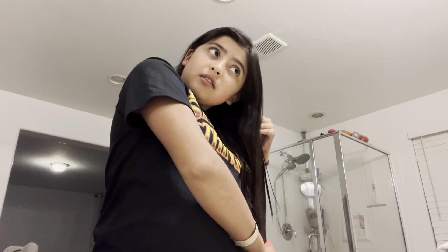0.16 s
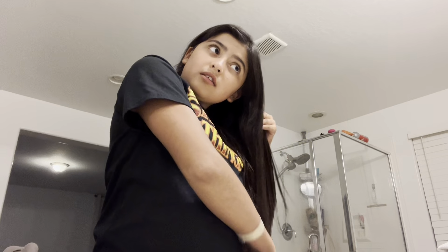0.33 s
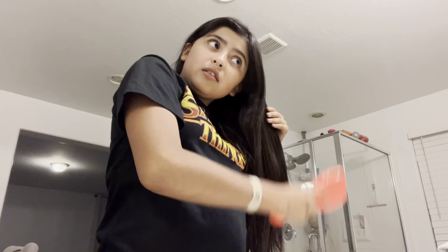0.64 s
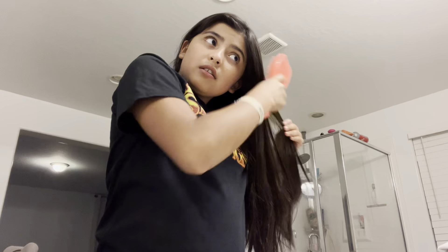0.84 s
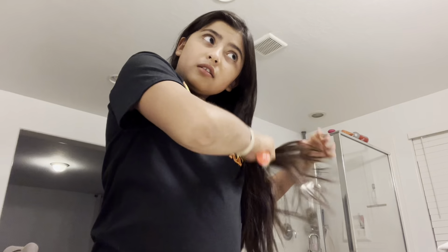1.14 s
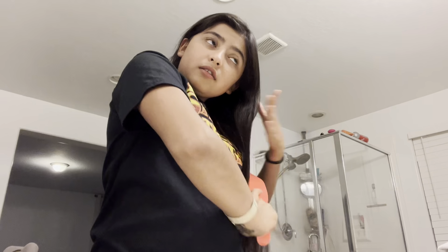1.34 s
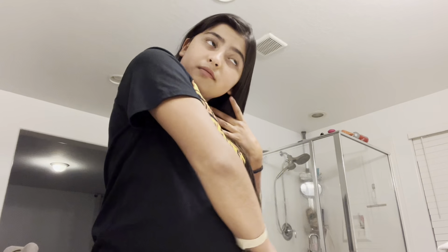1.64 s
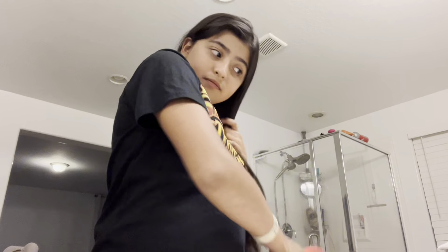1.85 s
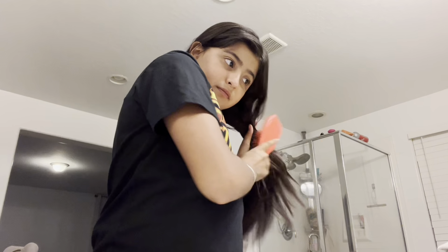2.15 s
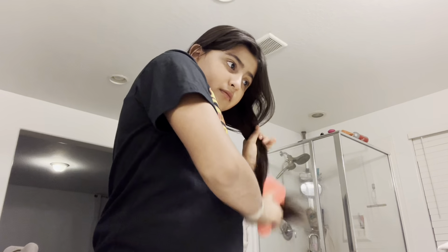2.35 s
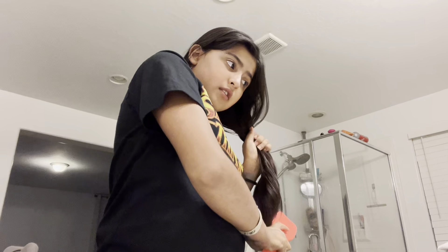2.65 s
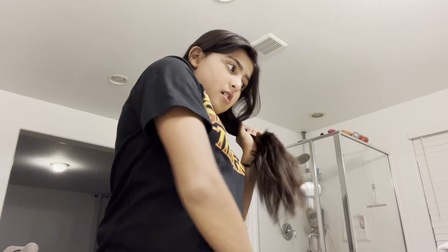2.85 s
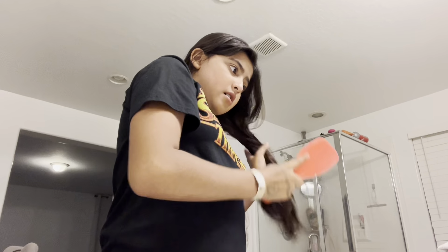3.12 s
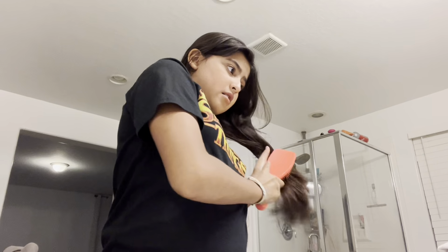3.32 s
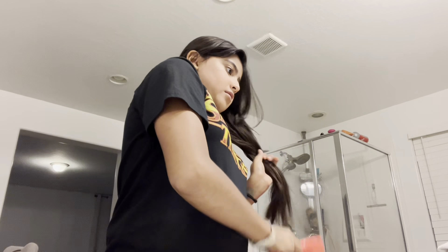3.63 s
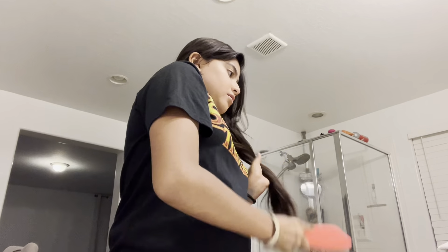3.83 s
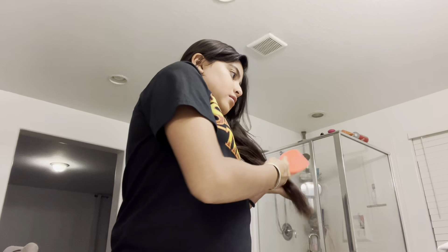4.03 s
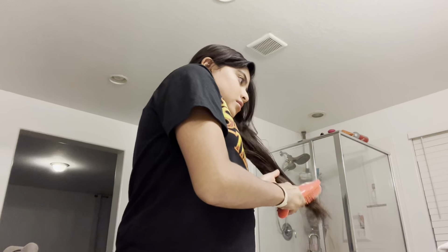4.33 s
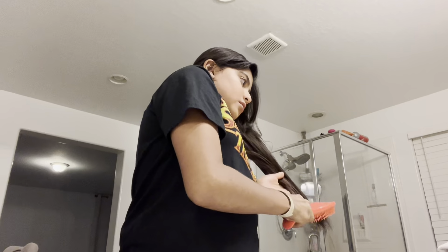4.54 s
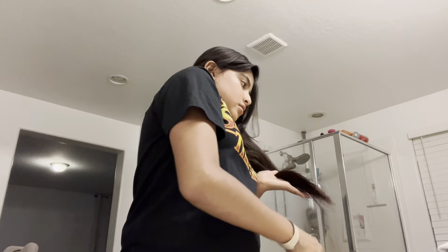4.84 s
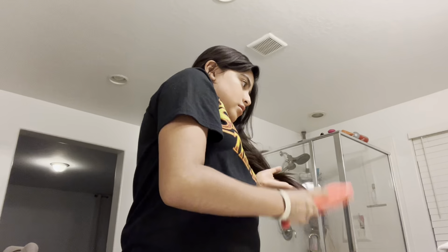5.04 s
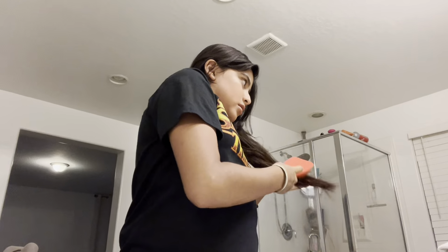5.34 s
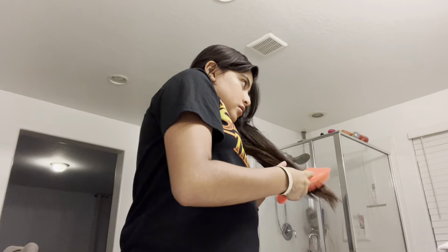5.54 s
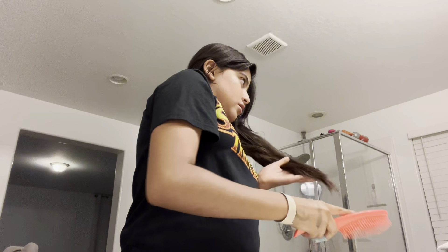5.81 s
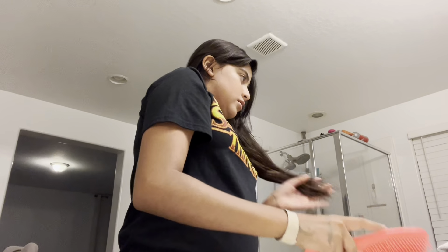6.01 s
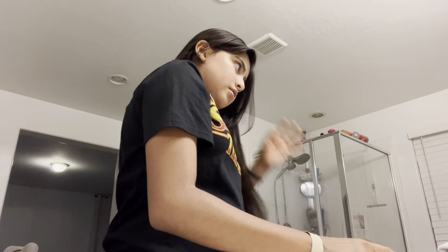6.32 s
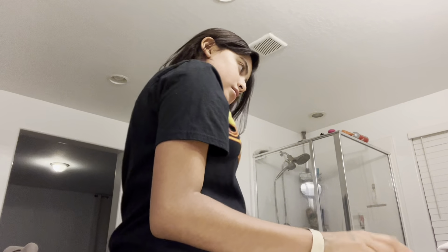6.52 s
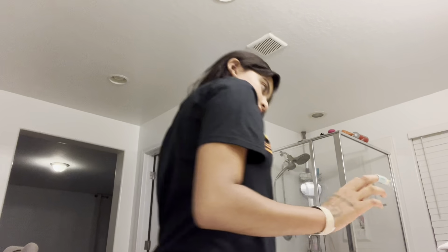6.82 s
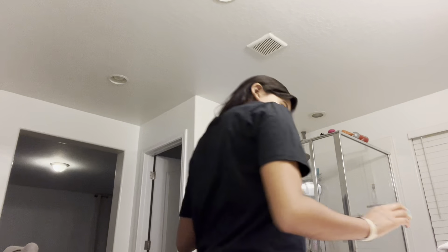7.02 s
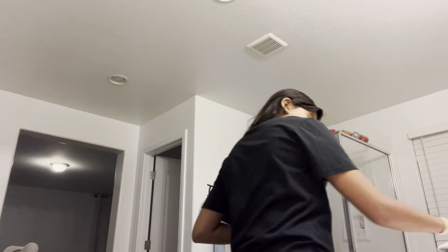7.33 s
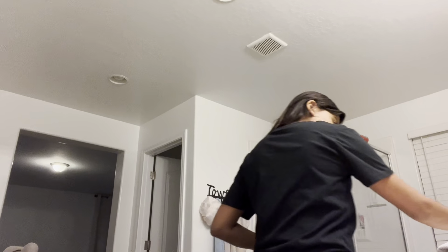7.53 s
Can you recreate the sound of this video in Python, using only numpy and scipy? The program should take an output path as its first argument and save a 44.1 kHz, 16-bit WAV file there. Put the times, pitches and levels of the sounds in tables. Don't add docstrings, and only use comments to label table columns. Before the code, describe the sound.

In a small tiled bathroom, a hollow plastic brush is pulled through long hair in short, uneven strokes: bristles tick on landing, strands hiss, knots snag and pop. Looser hair swishes between pulls. Late on, the brush back knocks hard once on an edge, with a brief tiled echo. A few weaker strokes follow, then handling rustle and dull set-downs on the counter. A deep, unsteady machine rumble runs throughout, picked up by a close stereo phone microphone.

```python
import sys
import numpy as np
from scipy import signal
from scipy.fft import rfft, irfft, next_fast_len
from scipy.io import wavfile
from scipy.ndimage import map_coordinates

SR = 44100
rng = np.random.default_rng(int(sys.argv[2]) if len(sys.argv) > 2 else 0)


def elevation(decibels):
    levels = np.asarray(decibels, float)
    return 10 ** (levels / 20)


def unload_wav(signal):
    wavfile.write(
        sys.argv[1],
        SR,
        np.round(np.clip(np.atleast_2d(signal).T, -1, 1) * 32767).astype(np.int16),
    )


N = 338247
EDGE = 4096

# (frequency [Hz], width [Hz], level [dB])
CUSHION = [(355, 65, -4.5), (481.4, 36, 4.5), (636.7, 167, 3.5), (685, 42, 10), (808, 31.4, 0)]
# (frequency [Hz], width [Hz], level [dB])
STIFF_BACK = [(916, 75, -5.5), (1053, 87, 2.5), (1124, 120, 2), (1356, 382, -10)]
# (frequency [Hz], width [Hz], level [dB])
CONTACT = [(2020, 4200, -13.5), (4280, 3100, -3.5), (8850, 3700, -31.5)]


def unit(x):
    return x / np.sqrt(np.mean(x ** 2) + 1e-20)


def along(points, hz):
    f, v = np.transpose(points)
    return np.interp(np.log(hz + 1), np.log(f + 1), v)


def curves(rows):
    s, *cols = np.transpose(rows)
    return [np.interp(np.arange(N) / SR, s, c) for c in cols]


def wobble(rate):
    points = rng.standard_normal(int(N * rate / SR) + 4)
    return map_coordinates(points, [np.arange(N) * rate / SR])


def filtered(x, response, mirror="even"):
    wide = np.pad(x, [(0, 0)] * (x.ndim - 1) + [(EDGE, EDGE)], "reflect", reflect_type=mirror)
    m = next_fast_len(N + SR // 2)
    spectrum = rfft(wide, m) * response(np.fft.rfftfreq(m, 1 / SR))
    return irfft(spectrum, m)[..., EDGE:EDGE + N]


def resonances(modes):
    def response(f):
        total = 0
        for k, (centre, width, db) in enumerate(modes):
            peak = 1j * f * width / (centre * centre - f * f + 1j * f * width)
            total = total + (-1) ** k * elevation(db) * peak
        return total
    return response


def spread(pair):
    # (frequency [Hz], left-right likeness [-1 to 1])
    alike = [(60, 0.92), (130, 1), (290, 0.88), (600, -0.18), (1400, 0.45), (3100, 0.11), (6000, -0.046)]

    def mid_and_side(hz):
        turn = np.arccos(np.clip(along(alike, hz), -1, 1)) / 2
        return np.array([np.cos(turn), np.sin(turn)])
    mid, side = filtered(pair, mid_and_side, "odd")
    return np.array([mid + side, mid - side])


def sideways(x, lag_s):
    late = filtered(x, lambda f: np.exp(-2j * np.pi * f * lag_s))
    return spread(np.array([x, -late]))


def humps(rows, db, rest_db=-120):
    s, rise, fall = np.transpose(rows)[:3, :, None]
    t = np.arange(N * 1000 // SR + 2) / 1000 - s
    away = np.maximum(-t / rise, t / fall) ** 1.253
    shape_db = db[:, None] - 20 * away
    return elevation(rest_db) ** 2 + np.sum(elevation(shape_db) ** 2, axis=0)


def level(power):
    return np.interp(np.arange(N) / SR * 1000, np.arange(len(power)), 10 * np.log10(power))


def rumble():
    # (peak [s], rise [s], fall [s], level [dB], pitch [Hz])
    boom = [(0.0, .3, 0.54, -30, 64.7), (.49, 0.56, 0.2, -31, 72.72), (.79, 0.11, 0.089, -25, 69.1),
            (.92, 0.15, 0.2, -32.5, 75.14), (1.179, 0.16, 0.29, -37, 72.6), (1.6, 0.62, 0.36, -54.5, 63.73),
            (1.98, 0.14, 0.073, -26, 70.82), (2.22, 0.78, 0.42, -33, 71.03), (2.71, 0.31, 0.19, -41, 69.6),
            (3.099, 0.053, 0.021, -31, 78.24), (3.3, 0.048, 0.75, -44.5, 71.3),
            (3.54, .25, 0.26, -40, 66.76), (3.82, 0.046, 0.4, -29.5, 72.39), (4.12, .4, 0.13, -32, 72.7),
            (4.33, 0.27, 0.28, -48.5, 64.66), (4.63, 0.078, 0.17, -41.5, 74.04),
            (5.001, 0.031, 0.46, -33, 69.46), (5.54, 0.06, 0.37, -44, 69.6),
            (5.62, 0.42, 0.04, -36.5, 68.14), (5.978, 0.12, 0.19, -25.5, 70.55),
            (6.18, 0.41, 0.26, -33, 67.67), (6.598, 0.18, 0.24, -40.5, 69.7), (7.07, 0.26, 0.42, -31, 72.6),
            (7.48, 0.11, 0.11, -31.5, 67)]
    # (peak [s], rise [s], fall [s], level [dB])
    hum = [(.21, 0.14, .15, -43), (.55, 0.41, 0.51, -50.5), (0.872, 0.092, 0.34, -40.5),
           (1.18, 0.039, 0.18, -36), (1.49, 0.055, .2, -33), (1.95, 1, .15, -52), (2.22, 0.26, 0.24, -41.5),
           (2.71, 0.12, 0.23, -35), (3.099, 0.22, 0.089, -46.5), (3.27, 0.12, 0.19, -36.5),
           (3.541, 0.061, 0.11, -36), (3.82, .1, 0.15, -46.5), (4.12, .1, 0.11, -56), (4.34, .3, 0.51, -61),
           (4.64, 0.16, 0.076, -44), (4.959, 0.28, 0.16, -43.5), (5.529, 0.057, 0.048, -37.5),
           (5.83, 0.035, 0.093, -34), (6.07, 0.18, 0.38, -51), (6.259, 0.11, 0.09, -33.5),
           (6.43, .3, 0.37, -44.5), (6.77, 0.14, 0.037, -34.5), (6.9, 0.066, 0.19, -47),
           (7.15, .04, .13, -39), (7.478, 0.12, 0.31, -31.5)]
    # (frequency [Hz], density [dB per Hz])
    broad_colour = [(13, -71.5), (22, -45), (43, -10.5), (56, -5), (82, -8), (130, -10), (173, -15.5),
                    (205, -21), (283, -27.5), (400, -36), (600, -63), (1200, -100)]
    # (frequency [Hz], density [dB per Hz])
    air_colour = [(180, -33), (300, -16), (500, -18), (750, -31.5), (1280, -24.5), (1680, -35.5),
                  (9000, -44), (13500, -40), (15600, -47.5), (16500, -110)]
    low_db, second_db = [level(humps(rows, np.transpose(rows)[3], rest_db=-62.5)) for rows in (boom, hum)]
    low_hz, = curves([(row[0], row[4]) for row in boom])
    low_phase = 2 * np.pi * np.cumsum(low_hz + 2.67 * wobble(6.3)) / SR
    second_phase = 2 * np.pi * np.cumsum(99 + 7 * wobble(5.7)) / SR
    low = np.sqrt(2) * elevation(low_db - 2.5) * np.sin(low_phase)
    second = np.sqrt(2) * elevation(second_db - 0.87) * np.sin(second_phase)
    broad_db = -44.5 + 0.11 * (second_db - second_db.mean())
    broad = unit(filtered(rng.standard_normal((2, N)), lambda f: elevation(along(broad_colour, f))))
    air = unit(filtered(rng.standard_normal((2, N)), lambda f: elevation(along(air_colour, f))))
    return low + second + spread(elevation(broad_db) * broad + elevation(-75.5) * air)


def bathroom(x):
    # (frequency [Hz], time to fall by 60 dB [s])
    tiles = [(200, 0.3), (700, 0.39), (2000, 0.43), (5000, .25), (12000, 0.23)]
    hz, t, z = signal.stft(rng.standard_normal((2, SR // 2)), SR, nperseg=256)
    decay = elevation(-60 * t / along(tiles, hz)[:, None])
    build_up = 1 - np.exp(-t / 0.0045)
    tail = signal.istft(z * decay * build_up, SR, nperseg=256)[1]
    tail = tail / np.linalg.norm(tail[0])
    late = np.pad(x, (150, 0))[None]
    return spread(signal.fftconvolve(late, tail, axes=1)[:, :N])


def first_echoes(x):
    # (delay [s], level [dB], left over right [ratio])
    walls = [
        (.0068, -8.5, -1),
        (.011, -21, -.6),
        (0.0156, -19, -.3),
    ]
    dull = signal.lfilter(*signal.butter(1, 1500, fs=SR), x)
    return sum(elevation(db) * np.array([[left], [1]]) * np.roll(dull, round(s * SR)) for s, db, left in walls)


def near_walls(pair):
    t = np.arange(SR // 16) / SR
    echo = rng.standard_normal((2, len(t))) * elevation(-60 * t / 0.086)
    echo = echo / np.linalg.norm(echo, axis=1, keepdims=True)
    one, other = signal.fftconvolve(pair[:1], echo, axes=1)[:, :N]
    turn = 2 * np.pi * 0.45 * np.arange(N) / SR
    left = np.cos(turn) * one + np.sin(turn) * other
    right = np.cos(turn) * other - np.sin(turn) * one
    return pair + 1.15 * np.array([left, right])


def thuds():
    # (time [s], peak level [dB], pitch [Hz])
    set_downs = [
        (6.8, -43, 193),
        (6.875, -35, 179.6),
        (7.0, -40.5, 158.7),
        (7.452, -26.5, 118.7),
    ]
    out, t = np.zeros(N + SR), np.arange(SR // 4) / SR
    for s, db, hz in set_downs:
        swell = elevation(db - 60 * t / 0.25) * (1 - np.exp(-t / 0.0056))
        band = signal.butter(2, [hz * 0.76, hz * 1.96], "band", fs=SR)
        puff = unit(signal.lfilter(*band, rng.standard_normal(len(t))))
        out[round(s * SR):][:len(t)] += swell * (0.21 * np.sin(2 * np.pi * hz * t) + 0.5 * puff)
    return out[:N]


def knock():
    # (time [s], peak level [dB], crack level [dB])
    blows = [
        (4.8769, -29.5, -30),
        (4.879, -13, -21),
    ]
    # (frequency [Hz], level [dB], time to fall by 60 dB [s])
    shell = [(366, -19, 0.073), (408.5, -1.5, 0.043), (557, -10, 0.036), (710, -7.5, 0.049),
             (744, 6, 0.017), (865, 2.5, 0.016), (1020, -6, 0.018), (1190, -6.5, 0.038),
             (1412, -2.5, 0.018), (1770, -6.5, 0.011), (2030, -16.5, 0.022), (2510, -12.5, 0.01)]
    out, contact, t = np.zeros(N + SR), np.zeros(N), np.arange(SR // 3) / SR
    for s, db, crack_db in blows:
        ring = sum(elevation(mode_db - 60 * t / t60) * np.sin(2 * np.pi * hz * t) for hz, mode_db, t60 in shell)
        ring = ring * (1 - np.exp(-t / 0.00066))
        wisp = elevation(crack_db - 9.5 - 60 * t / 0.037) * rng.standard_normal(len(t))
        out[round((s + 0.0021) * SR):][:len(t)] += elevation(db - 1.0) * (ring + wisp)
        contact[round((s + 0.0012) * SR)] = elevation(db + crack_db + 19.5)
    crack = filtered(contact, lambda f: sum(resonances([peak])(f) for peak in CONTACT))
    return out[:N] + crack


def taps():
    # (time [s], tick level [dB], push on the pad [dB], tick pitch [Hz])
    landings = [(0.0005, -44, 3, 3000), (0.1342, -45, -2, 2080), (0.2867, -52, 15, 2380),
                (0.755, -65, -25, 6580), (1.333, -42, -14, 3920), (1.4068, -33, -32, 2120),
                (1.697, -37, 11, 2940), (1.6633, -55.5, -3.5, 3830), (2.1906, -52, -1, 4200),
                (2.2004, -60, 21.5, 2426), (2.2591, -51.5, 13.5, 2388), (2.529, -47, -18, 4560),
                (2.6106, -54, -1, 2869), (2.616, -49, 9, 5050), (2.6779, -51, 17, 3080),
                (2.7013, -31, 4.5, 4400), (2.7025, -41, 6, 2204), (3.3075, -52, 9.5, 3032),
                (3.4363, -72, 12, 1963), (3.455, -56, 4, 2000), (3.483, -54, 1, 5200),
                (4.149, -46.5, -8, 2300), (4.239, -57, 0.5, 2600), (4.093, -50.5, -4.5, 3500),
                (4.17, -50.5, 10.5, 2503), (4.196, -62, 15, 2106), (4.401, -50, 3, 2800),
                (4.47, -42.5, 4.5, 3200), (4.6412, -69.5, 12.5, 2065), (4.7074, -58.5, 16.5, 2000),
                (4.733, -41, 3, 4000), (5.3262, -58.5, -1, 4200), (5.4087, -50, -6, 2400),
                (5.4164, -47.5, -1, 2519), (5.5243, -49, 2, 2000), (5.5633, -57, -4, 2400),
                (5.5844, -52, -9, 2400), (5.9806, -66.5, -9, 3020), (6.2682, -52, 0, 2205),
                (6.2894, -57, -9, 2100), (6.3604, -78.5, 21, 2020), (6.868, -65, 5, 3570),
                (6.991, -38, -1.5, 1698), (7.439, -58, 9, 2507), (7.456, -49, -15, 7500),
                (6.982, -56, 0, 4000)]
    # (time [s], tick level [dB], push on the pad [dB], tick pitch [Hz])
    further_taps = [(1.402, -51, -11, 7000), (1.431, -50, -3, 3200), (1.447, -45, 6.5, 2200),
                    (1.467, -48.5, 2, 2800), (1.495, -50, -5, 4500), (2.265, -44, 8, 2184),
                    (2.308, -46.5, 8, 4800), (2.366, -50, 1.5, 3404), (2.448, -41, 4, 2200),
                    (5.5523, -55, 1, 2000), (6.3064, -50, -3, 1900), (6.3335, -56, -4, 1800),
                    (6.791, -67, 12, 3500), (2.203, -53.5, 9, 1500), (4.4687, -52.5, 12.5, 1500)]
    ticks, pushes, t = np.zeros(N + SR), np.zeros(N), np.arange(400) / SR
    for s, db, pad_db, hz in landings + further_taps:
        tips = signal.butter(2, [hz / 2.14, hz * 1.24], "band", fs=SR)
        burst = elevation(-60 * t / 0.013) * (0.5 * rng.standard_normal(len(t)) + (t == 0))
        tick = signal.lfilter(*tips, burst) + 0.03 * burst
        ticks[round(s * SR):][:len(t)] += elevation(db + 12.5) * tick
        pushes[round(s * SR)] = elevation(db + pad_db + 29)
    crisp = signal.lfilter([1, -1], [1, -0.8], ticks[:N])
    return crisp + filtered(pushes, resonances(CUSHION + STIFF_BACK))


def scrape(times, rows, width, rise, steady):
    out = np.zeros((2, N + SR))
    for (start, length), (hz, end_hz, db) in zip(times, rows):
        u = np.arange(round(length * SR)) / (SR * length)
        fall = np.minimum((1 - u) / (1 - rise), 1) ** np.exp(-length / 0.4)
        fade = np.minimum(u / rise, 1) * fall
        low_pass = signal.butter(3, width * (1 + length / 0.4) * hz / 2, fs=SR)
        noise = signal.lfilter(*low_pass, rng.standard_normal((2, 2, len(u) + EDGE)))
        noise = unit(noise)[..., EDGE:]
        tone = steady * np.exp(-(length / 0.09) ** 2)
        turn = 2 * np.pi * np.cumsum(hz + (end_hz - hz) * u) / SR
        band = (noise[0] + tone) * np.cos(turn) + noise[1] * np.sin(turn)
        out[:, round(start * SR):][:, :len(u)] += elevation(db) * fade * band
    return out[:, :N]


def rubs():
    # (start [s], length [s])
    rub_times = [(.12, .04), (.29, .05), (1.44, .06), (1.665, .05), (1.675, .06), (1.73, .04), (2.255, .05),
                 (2.34, .07), (3.432, .08), (6.26, .16), (6.35, .07), (6.43, .06), (6.5, .28), (6.862, .05),
                 (6.985, .13), (7.05, .16), (2.348, .025), (1.405, .02), (6.77, .2), (6.4, .16),
                 (2.702, .015), (4.866, .014), (4.638, .02)]
    # (start pitch [Hz], end pitch [Hz], level [dB])
    rub_rings = [(1180, 770, -52), (615, 420, -49.5), (562, 536, -50.5), (1173, 700, -47),
                 (592, 522, -39.5), (1165, 920, -56), (647, 855, -53), (623, 680, -31.5), (679, 686, -47),
                 (2000, 1780, -62), (680, 680, -51.5), (1086, 1050, -60), (2800, 2800, -72),
                 (673.2, 648.5, -53.5), (1320, 1230, -56), (1245, 1080, -64), (3960, 5100, -60),
                 (1000, 950, -57), (2750, 3400, -86), (680, 680, -58.5), (413, 500, -43), (745, 820, -47),
                 (700, 640, -62)]
    # (start [s], length [s])
    bunch_times = [(.06, .05), (.13, .08), (1.4, .06), (1.44, .06), (1.655, .06), (2.185, .04),
                   (2.255, .05), (2.26, .06), (2.32, .08), (2.33, .07), (2.47, .05), (2.605, .05),
                   (2.67, .03), (2.71, .05), (3.51, .06), (3.58, .07), (4.165, .03), (4.18, .07),
                   (4.194, .03), (4.23, .03), (4.405, .04), (4.455, .05), (4.48, .07), (4.638, .025),
                   (4.675, .025), (4.73, .06), (5.324, .04), (5.41, .06), (5.55, .1), (5.93, .12),
                   (6.795, .05), (6.84, .06), (7.11, .07), (7.455, .06), (7.48, .05), (2.96, .2),
                   (7.436, .03), (6.788, .06), (6.262, .06), (1.404, .03)]
    # (start pitch [Hz], end pitch [Hz], level [dB])
    bunch_rings = [(1012, 1100, -53), (2100, 2000, -63), (1053, 930, -51), (3200, 3000, -58.5),
                   (3600, 3800, -53.5), (1008, 900, -56), (2400, 2700, -59), (4400, 3200, -62),
                   (4000, 8200, -49), (2150, 2000, -50), (670, 1700, -57), (920, 740, -53),
                   (896, 1050, -52), (1393, 1000, -53), (1190, 1100, -59), (1194, 1100, -44.5),
                   (840, 810, -51), (4960, 5900, -64.5), (925, 690, -50.5), (850, 1500, -51.5),
                   (704, 670, -52), (930, 1400, -51), (2100, 1600, -68), (1151, 994, -63), (1066, 760, -61),
                   (1125, 1400, -49), (966, 590, -59.5), (4750, 3100, -75), (2300, 2500, -59),
                   (1150, 560, -77), (956, 1300, -71), (3500, 3900, -71), (3500, 3800, -71),
                   (7500, 7000, -52), (2800, 2300, -59), (3670, 3900, -79), (6000, 6000, -71),
                   (3300, 3600, -73), (1950, 1800, -59), (4000, 4000, -57)]
    narrow = scrape(rub_times, rub_rings, width=0.1, rise=0.15, steady=2.2)
    return narrow + scrape(bunch_times, bunch_rings, width=0.25, rise=0.25, steady=0.9)


def effort():
    # (peak [s], rise [s], fall [s], force [dB], sheen (brightness) [dB])
    strokes = [(0.038, 0.073, 0.41, -55.5, 15), (0.15, 0.15, 0.089, -46.5, -7), (0.30, 0.036, 0.14, -52, 9),
               (1.15, 0.36, 0.36, -63, 2), (1.29, 0.084, 0.39, -62.5, 11.5), (1.41, 0.00934, 0.31, -51, 5),
               (1.463, 0.062, 0.12, -48.5, 6.5), (1.687, 0.069, 0.092, -44, 11),
               (2.268, 0.015, 0.15, -40.5, -7), (2.355, 0.14, 0.18, -37, 4.5),
               (2.618, 0.018, 0.11, -50, 4.5), (2.708, 0.028, .13, -43.5, 6.5), (3.31, 0.02, 0.13, -54, 12),
               (3.465, 0.025, 0.33, -47.5, 3), (3.59, 0.16, 0.11, -43, 6), (4.094, 0.0098, 0.054, -55, 12),
               (4.199, 0.097, 0.16, -50.5, 1), (4.479, 0.16, 0.11, -46, -0.5), (4.75, 0.047, 0.1, -45.5, 2),
               (4.87, 0.025, 0.27, -53.5, -49), (5.329, 0.014, 0.041, -62, 8.5),
               (5.44, 0.095, 0.12, -56, 1.5), (5.591, 0.079, 0.17, -51, -33),
               (5.643, 0.076, 0.081, -49, -1.5)]
    # (peak [s], rise [s], fall [s], level [dB])
    swishes = [(.27, 0.063, 0.22, -68), (0.48, 0.23, 0.075, -63), (.75, 0.017, 0.091, -84.5),
               (1.0, 0.058, 1, -73), (1.62, 0.13, 0.42, -73), (2.09, 0.75, 0.79, -84.5),
               (2.201, 0.19, 0.12, -69), (2.78, 0.11, 0.16, -56), (2.91, 0.11, 0.12, -58),
               (5.44, 0.065, 0.14, -89), (7.23, 0.095, 0.087, -80), (3.66, 0.2, 0.18, -59.5),
               (3.86, 0.61, 0.07, -70.5)]
    # (peak [s], rise [s], fall [s], rustle [dB], weight [dB])
    handling = [(0.881, 0.087, 1, -100, 31.5), (1.95, 0.97, 0.19, -84, 17), (3.05, 0.5, 0.51, -91.5, 24),
                (3.96, 0.13, 0.081, -100, 29), (4.649, 0.025, 0.194, -97.5, 38),
                (5.8, 0.089, 0.15, -100, 13), (5.98, .02, 0.18, -76.5, 0), (6.16, 0.11, 0.14, -58, -9),
                (6.33, 0.3, 0.4, -87.5, 30.5), (6.45, 0.13, 0.14, -67.5, -7),
                (6.79, 0.25, 0.1354, -88, 21.5), (6.879, 0.12, 0.19, -68, 4),
                (6.992, 0.028, 0.13, -63, 9.5), (7.17, 1, 0.11, -76.5, 4.5),
                (7.464, 0.017, 0.13, -50, -18.5), (7.62, 0.24, 0.21, -72, 5)]
    force, sheen = np.transpose(strokes)[3:]
    swish = np.transpose(swishes)[3]
    rustle, weight = np.transpose(handling)[3:]
    rest_db = -104

    pad = humps(strokes, force, rest_db=-84) + humps(handling, rustle + weight)

    bristle = humps(strokes, force - 11.5 + 0.14 * sheen, rest_db)
    bristle += humps(swishes, swish - 13)
    bristle += humps(handling, rustle + 0.36 * weight + 1.5)

    hiss = humps(strokes, force - 22 + sheen, rest_db)
    hiss += humps(swishes, swish) + humps(handling, rustle)

    crackle = humps(strokes, force - 21.5 + sheen, rest_db)
    crackle += humps(swishes, swish)
    crackle += humps(handling, rustle + 0.38 * weight - 5)
    return [level(power) for power in (pad, bristle, hiss, crackle)]


def slips(rate, scatter_db, smooth):
    starts = rng.random(N) < rate / SR
    size = starts * elevation(scatter_db * np.tanh(rng.exponential(size=N) / 2))
    burst = signal.lfilter([1], [1, -0.95], size)
    return (unit(burst) + smooth) * rng.standard_normal((2, N))


def snags(pad_db, bristle_db):
    sharp = (rng.random(N) < 160 / SR) * rng.standard_normal(N)
    flicks = signal.lfilter(*signal.butter(2, 2600, fs=SR), sharp)
    knocks = unit(filtered(flicks, resonances(CUSHION + STIFF_BACK)))
    tips = unit(filtered(flicks, lambda f: resonances(CONTACT[:1])(f) ** 2))
    return sideways(knocks * elevation(pad_db - 9) + tips * elevation(bristle_db - 17), lag_s=1 / 4000)


def brush():
    # (time [s], grip [0-1], bite of the tips [dB])
    hand = [(0, 0.4, -10), (.11, 0.63, -2.5), (.3, 0.2, -0.5), (1.3, 0.36, 1.5), (1.5, 0.63, 2.5),
            (2.36, 0.27, -0.5), (2.75, 0.69, 1.5), (3.3, 0.35, 1.5), (3.6, 0.8, -0.5), (4.2, 0.45, 1),
            (4.5, 0.82, -7), (5.0, 0.7, -1.5), (5.4, 0.35, 6.5), (5.7, 0.65, 4), (6.3, 0.35, 5.5),
            (7.0, 0.52, -0.5)]
    # (time [s], level [dB])
    facing = [(0, -2), (.7, -4), (1.2, 4), (1.7, -4.5), (2.3, 2), (2.75, -2), (3.3, 0.5), (4.7, -2),
              (5.2, 5.5), (5.8, 5), (6.15, -5.5), (6.5, 7), (7.0, -2.5), (7.22, 6), (7.5, -0.5)]
    # (frequency [Hz], density [dB per Hz])
    bristle_colour = [(880, -45.5), (1330, -2), (1620, -5.5), (1990, -3), (2400, -6), (3770, -8.5),
                      (4040, -8), (6000, -13.5), (7800, -28.5), (13200, -120)]
    hair_colour = [(2200, -42.5), (2800, -5.5), (4000, -4.5), (5500, -5.5), (7000, -6.5), (9000, -3.5),
                   (10500, -8.5), (11500, -38.5)]
    crackle_colour = [(9500, -38), (11000, -9), (13500, -0.5), (15000, -3), (15700, -15), (16500, -62)]
    pad_db, bristle_db, hiss_db, crackle_db = effort()
    grip, bite_db = curves(hand)
    facing_db, = curves(facing)
    drag = wobble(35)
    grip = np.clip(grip, 0, 1) * np.pi / 2

    shake = near_walls(slips(160, 2.5, 1.0))
    cushion = np.cos(grip) * unit(filtered(shake, resonances(CUSHION)))
    back = 0.49 * np.sin(grip) * unit(filtered(shake, resonances(STIFF_BACK)))
    pad = (cushion + back) * elevation(pad_db + 1.3 * drag + 0.23 * wobble(90) + 3.5)

    flick = near_walls(slips(260, 6, 1.0))
    bristle = unit(filtered(flick, lambda f: elevation(along(bristle_colour, f))))
    bristle = bristle * elevation(bristle_db + bite_db + 0.86 * drag - 0.5)

    rustle = slips(380, 8, 2.2)
    hiss = unit(filtered(rustle, lambda f: elevation(along(hair_colour, f))))
    hiss = hiss * elevation(hiss_db + 1.6 * drag + 2.0)
    crackle = unit(filtered(rustle, lambda f: elevation(along(crackle_colour, f))))
    crackle = crackle * elevation(crackle_db + facing_db + 1.3 * drag + 2.0)
    return pad + bristle, hiss + crackle, snags(pad_db, bristle_db + bite_db)


def scene():
    room = rumble()
    hits, blow = taps() + thuds(), knock()
    near = sideways(hits, lag_s=1 / 4000) + sideways(blow, lag_s=1 / 8000)
    echoes = first_echoes(blow) + elevation(-6.5) * bathroom(blow) + elevation(-5.0) * bathroom(hits)
    body, hair, knots = brush()
    return room + near + echoes + spread(body + hair + rubs()) + knots


def roll_off(x):
    return signal.sosfilt(signal.butter(12, 15960, fs=SR, output="sos"), x)


def record(dry):
    # (frequency [Hz], left minus right [dB])
    lean = [(60, 1.5), (300, 4), (700, 0.5), (1300, -2), (2400, 2), (6000, 1.5)]
    sides = np.array([[1], [-1]])

    def high(f):
        return np.clip((f - 6800) / 600 + 0.5, 0, 1)

    def turn(f):
        return np.exp(-1j * np.pi * (f - 8030) / 5360 * sides)
    leaning = filtered(dry, lambda f: elevation(along(lean, f) / 2 * sides), "odd")
    lower = filtered(leaning, lambda f: np.sqrt(1 - high(f) ** 2), "odd")
    top = filtered(np.sqrt(2) * dry.mean(axis=0), lambda f: high(f) * turn(f), "odd")
    return roll_off(lower + top)


dry = scene()
out = record(dry)
unload_wav(out)
```